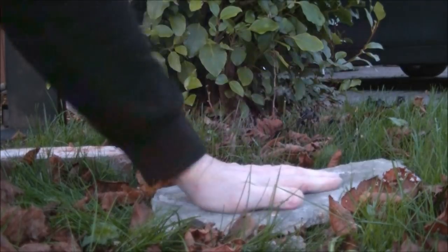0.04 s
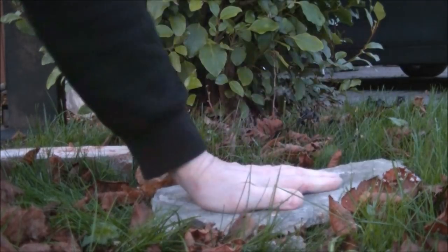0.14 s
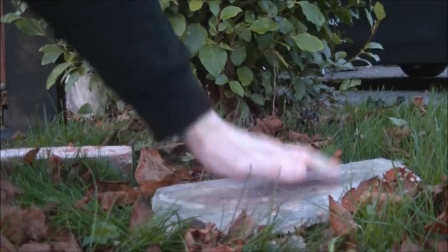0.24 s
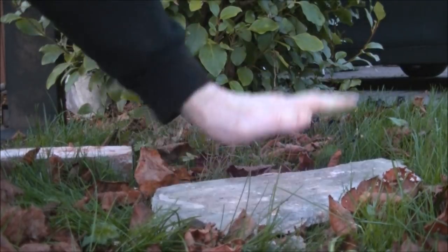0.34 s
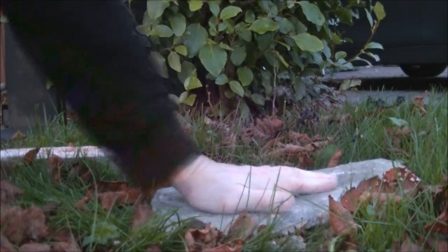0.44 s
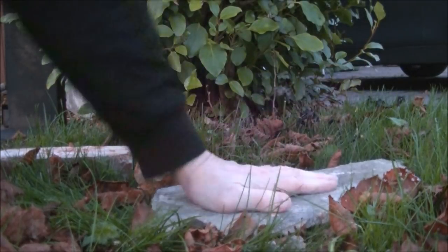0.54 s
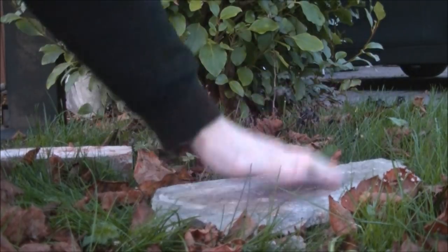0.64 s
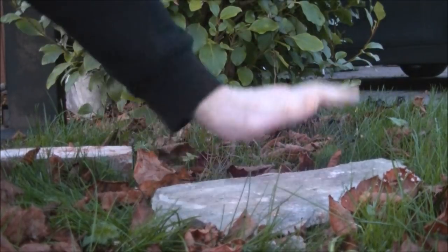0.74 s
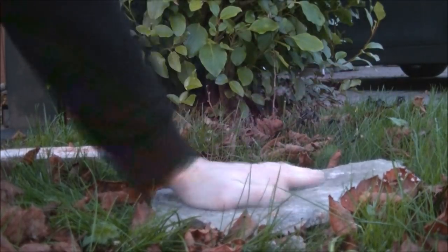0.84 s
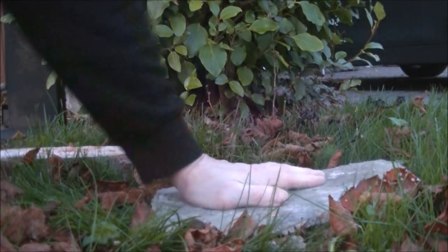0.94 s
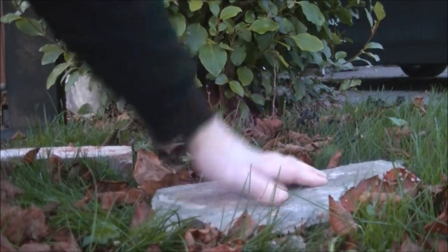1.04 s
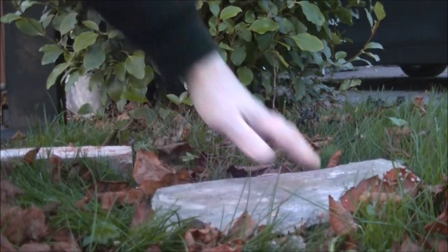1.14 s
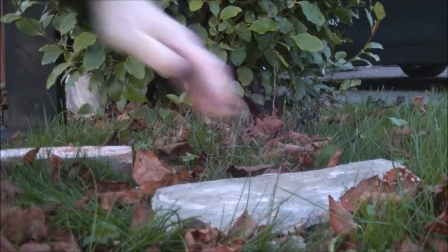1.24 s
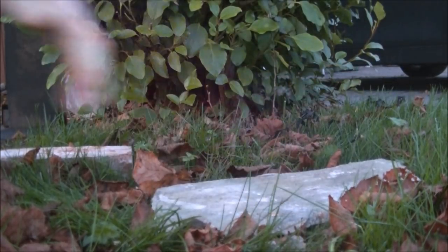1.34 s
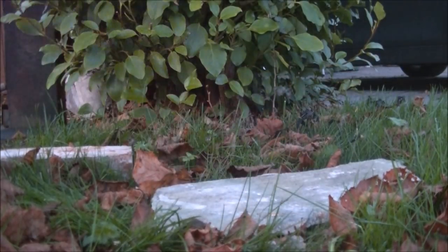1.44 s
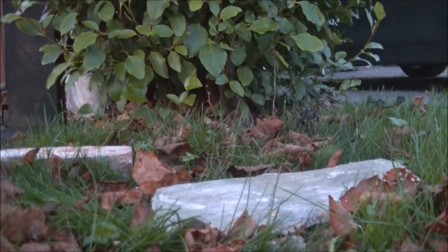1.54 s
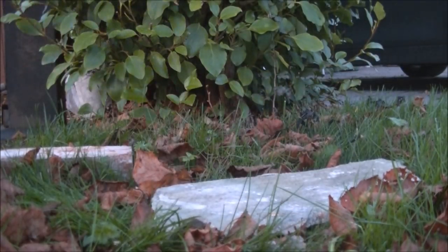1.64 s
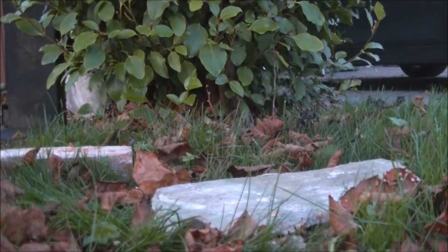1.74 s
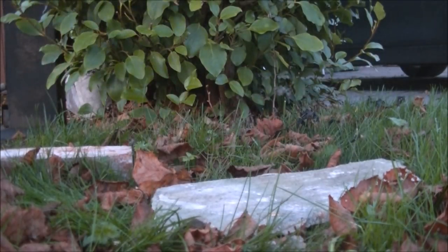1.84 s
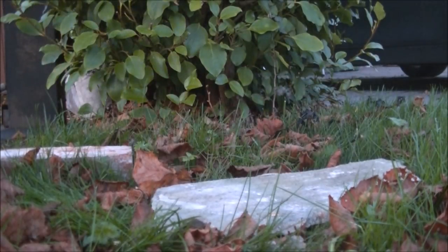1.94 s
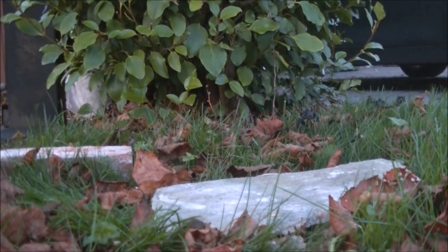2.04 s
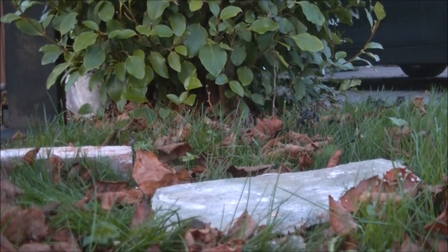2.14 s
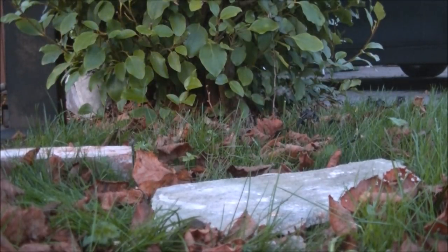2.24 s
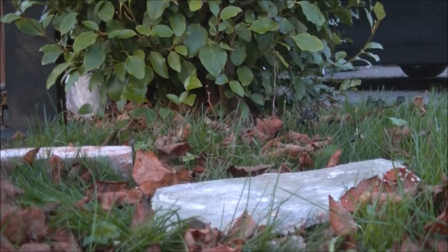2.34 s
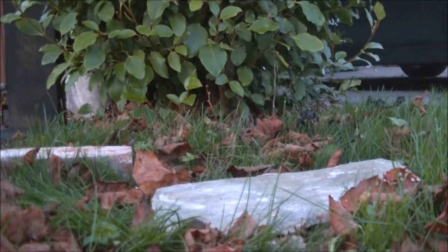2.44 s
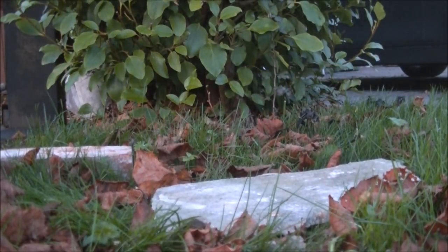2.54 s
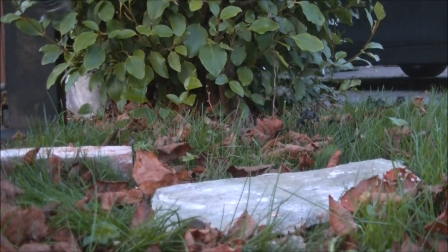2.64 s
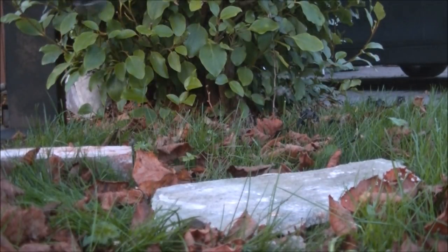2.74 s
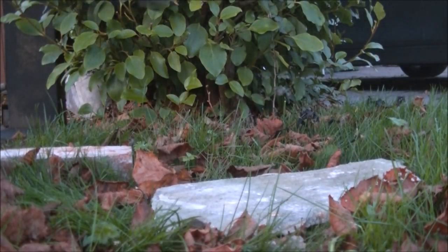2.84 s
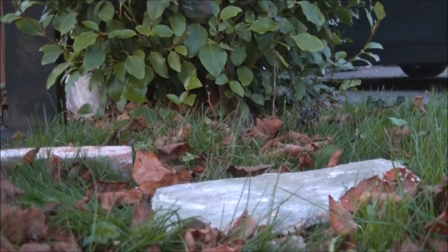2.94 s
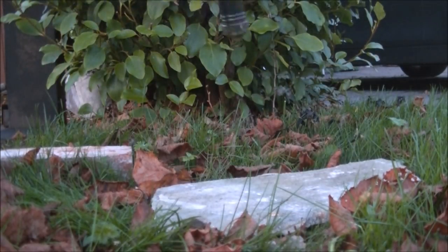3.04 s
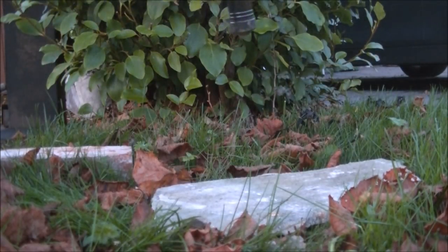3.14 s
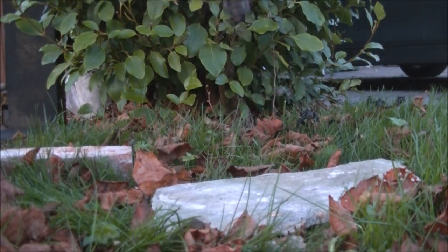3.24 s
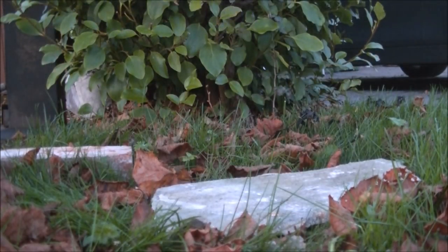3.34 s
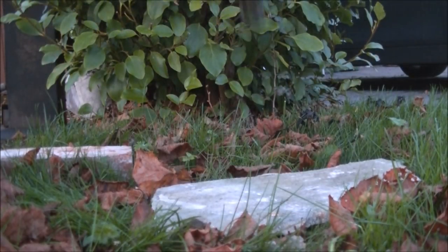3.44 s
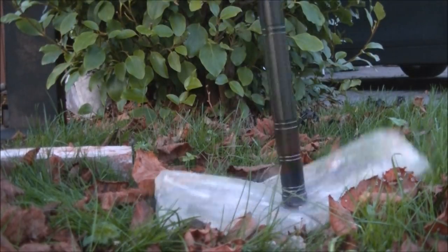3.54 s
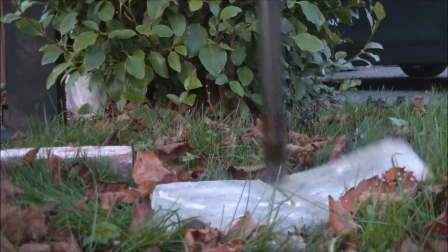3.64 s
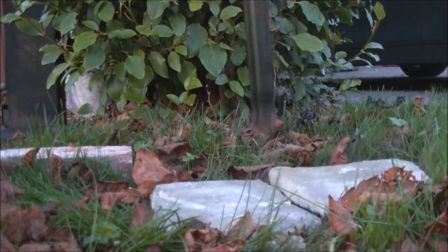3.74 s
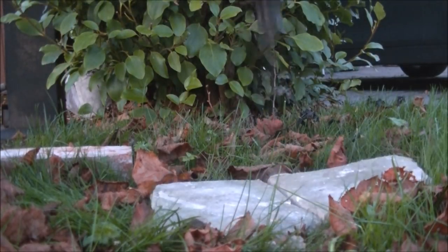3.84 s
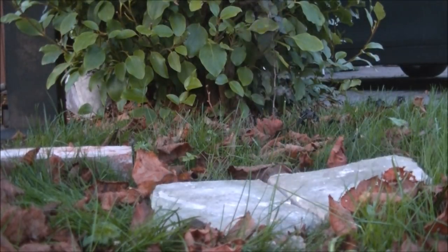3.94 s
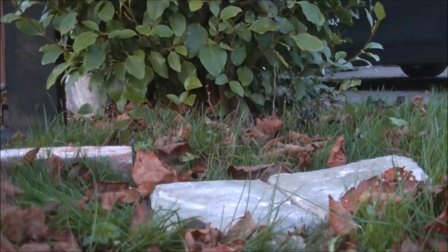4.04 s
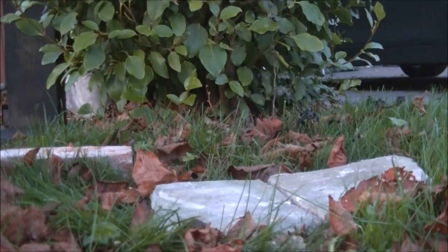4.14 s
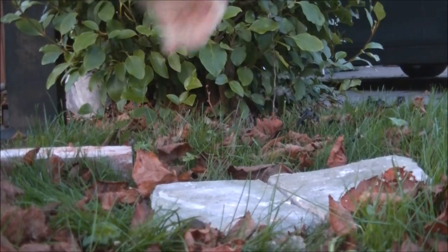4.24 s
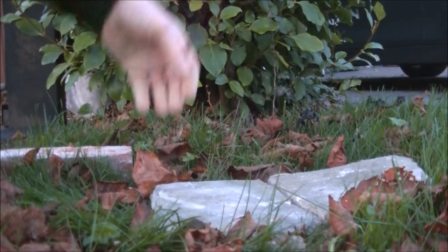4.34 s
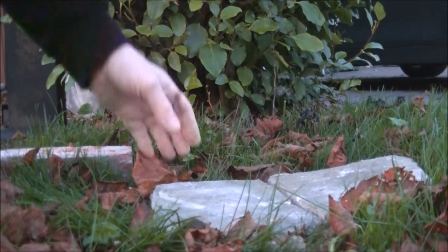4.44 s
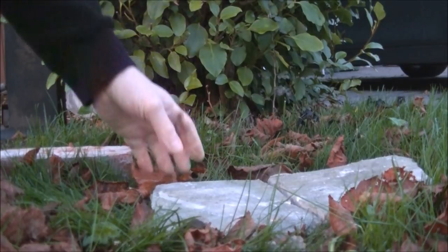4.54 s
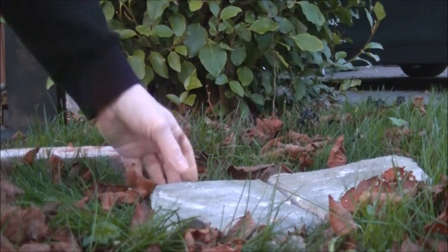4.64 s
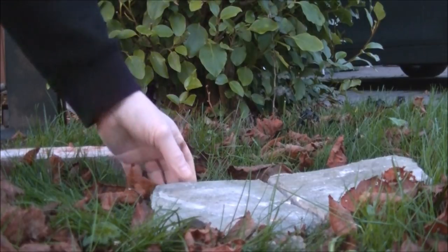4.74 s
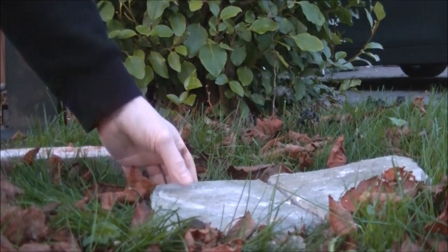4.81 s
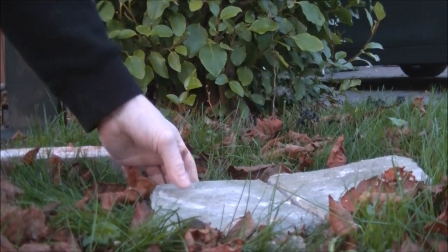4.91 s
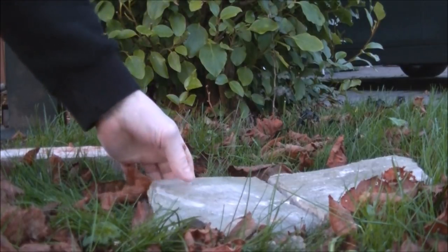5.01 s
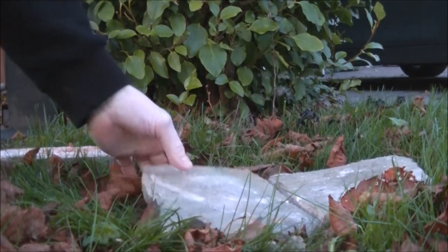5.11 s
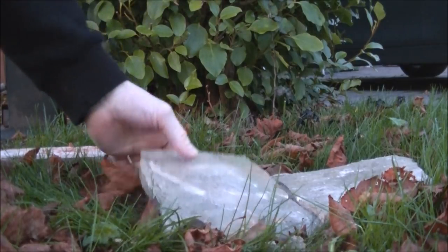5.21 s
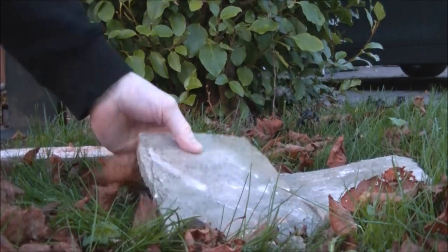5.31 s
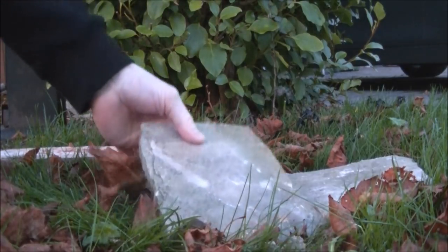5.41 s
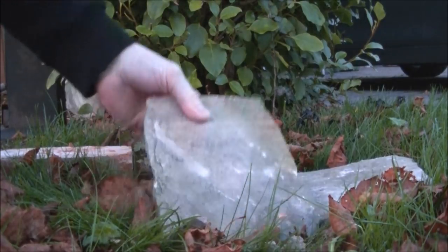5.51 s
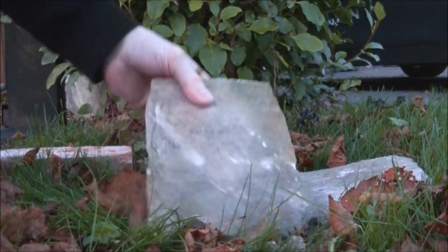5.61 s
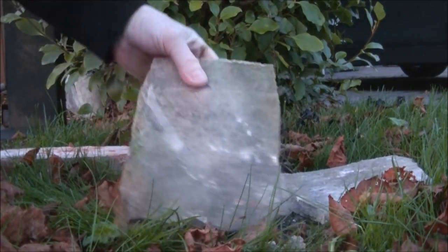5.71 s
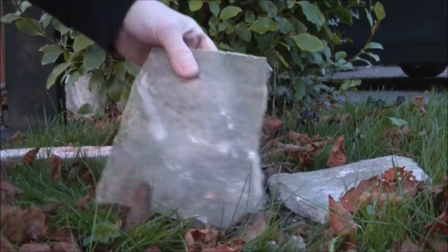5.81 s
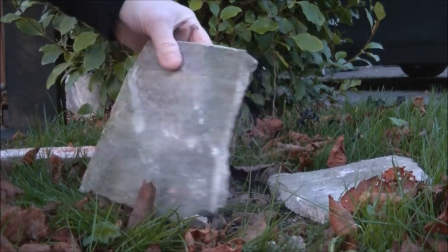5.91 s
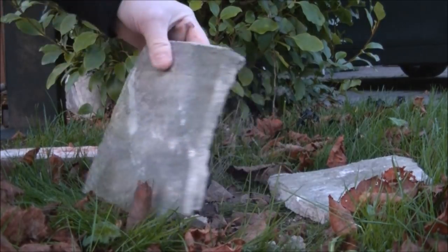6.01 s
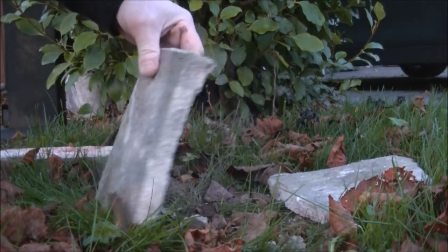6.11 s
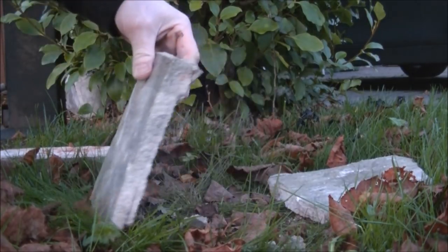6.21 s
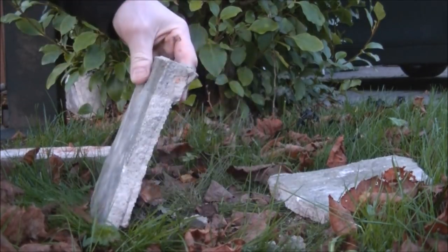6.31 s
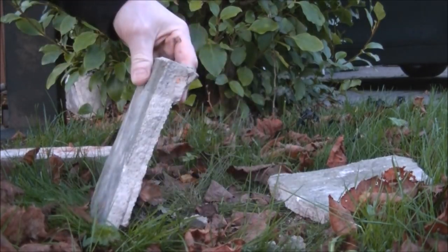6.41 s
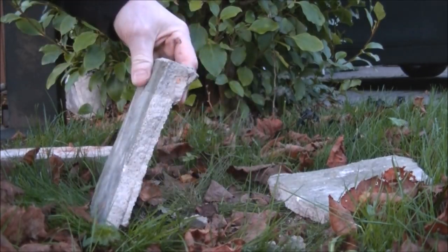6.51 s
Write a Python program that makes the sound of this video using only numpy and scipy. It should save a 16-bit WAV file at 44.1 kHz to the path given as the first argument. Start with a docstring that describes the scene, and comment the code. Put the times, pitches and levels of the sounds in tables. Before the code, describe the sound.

Three loud, short slaps of a flat hand on stone come in quick succession, followed by soft cloth rustling and leaf crackle. After a quiet gap with thin bird calls, a metal baton strikes with a sharp, slightly distorted crack and an outdoor echo. Pieces clatter briefly, then a broken half is lifted, scraping and clinking through grit and grass. Close stereo microphones, with faint far traffic behind.

```python
"""A flat hand slaps a stone slab three times in a front garden, then a metal baton cracks it in two.
The blows are shaped noise bursts over decaying stone modes; a house wall and the street return them.
The halves knock, land and lift with ticks and short rings; leaves snap in brief noise bursts.
A jacket sleeve and dragged stone rustle as showers of tiny slips; a small bird ticks in climbing whistles.
Far off, filtered noise murmurs as traffic; two close microphones hear it and the loudest peaks are rounded."""
import sys
import numpy as np
from scipy import signal
from scipy.fft import rfft, irfft, next_fast_len
from scipy.io import wavfile
from scipy.ndimage import uniform_filter1d

SR = 44100
rng = np.random.default_rng(int(sys.argv[2]) if len(sys.argv) > 2 else 0)


def digitize_waveform(pressure):
    """Quantize a signal to 16-bit integers and store it at the path in sys.argv[1].

    Rows of a 2-D input are taken as channels; values are limited to [-1, 1].
    """
    field = np.atleast_2d(pressure).T
    bounded = np.clip(field, -1, 1)
    quanta = np.round(bounded * 32767).astype(np.int16)
    wavfile.write(sys.argv[1], SR, quanta)


N = 289737

# palm on the slab: (time [s], level before force [dB], contact length [s], air rebound delay [s],
# thump [dB], smack [dB], sting [dB], slab ring [dB], echo send [dB])
PALM_SLAPS = [(.0056, -4.5, 0.0029, 0.00095, 7.5, 0.5, -2.5, 4, -4),
              (0.448, -4, 0.0036, 0.000913, 8, 3, 0.5, 0, 1),
              (0.8513, -1, .0024, 0.001, -3, 4.5, -1, -3.5, 2.5)]
# the pop of air under the palm: (frequency [Hz], level [dB])
PALM_POP = [(100, -33), (170, -9), (280, -3), (500, -3), (780, 2), (1100, 0.5), (1600, -1), (2200, -3.5),
            (3200, -7), (4300, -5.5), (5000, -12.5), (7000, -8), (10000, -13.5), (12000, -23), (16000, -38)]
# the whole slab, damped by soil and hand: (frequency [Hz], level [dB], t60 [s])
SLAB_MODES = [(385, -9.5, 0.056), (757, -2, 0.077), (2166, -5, 0.024), (2233, -5.5, 0.049),
              (3080, -6.5, 0.026)]


def slaps(force_db, ring_db):
    """The palm pops the air beneath it and rings the slab; gives the hits and the air's rebounds."""
    hits, rebounds = [], np.zeros(N)
    for s, db, length_s, rebound_s, thump_db, smack_db, sting_db, slab_db, echo_db in PALM_SLAPS:
        # the hand's shape colours each slap
        cupping = [(380, thump_db), (700, 0), (1100, 0), (1550, smack_db), (2200, 0), (3200, sting_db)]
        pop = colour(colour(contact(length_s), PALM_POP), cupping)
        pop = undb(db + force_db) * pop
        # trapped air springs back: hollow from close by
        add(rebounds, s + rebound_s, -0.65 * uniform_filter1d(pop, size=3))
        slab = undb(db + ring_db + slab_db) * ring(SLAB_MODES)
        hits.append((s, pop + slab, echo_db))
    return hits, rebounds


# baton tip, then the duller blow of the slab giving way: (time [s], level before force [dB],
# contact length [s], ring [dB], echo send [dB], top of the treble [Hz])
BATON_STRIKES = [(3.5162, 0, 0.0017, -3, 13.5, 14000), (3.521, -7, 0.00153, 4, 14.5, 2520)]
# the crack of metal on stone: (frequency [Hz], level [dB])
METAL_CRACK = [(90, -39), (230, -9.5), (430, 1), (750, 3.5), (1000, -3.5), (1600, 3.5), (2050, -1.5),
               (2600, -10.5), (3400, -8), (4800, -6.5), (6500, -11.5), (8500, -23), (16000, -41)]
# a broken half of the slab: (frequency [Hz], level [dB], t60 [s])
HALF_MODES = [(450, -5.5, 0.018), (620, -5.5, 0.057), (779, 2, 0.05), (1616, -6, 0.085),
              (2020, -4.5, 0.027), (3470, -12, 0.023), (4760, -10, 0.035)]


def strikes(force_db, ring_db):
    """Metal on stone: a band-limited crack over the ringing modes of a broken half."""
    hits = []
    for s, db, length_s, half_db, echo_db, top_hz in BATON_STRIKES:
        crack = undb(force_db) * band(colour(contact(length_s), METAL_CRACK), 97, top_hz)
        half = undb(ring_db + half_db) * ring(HALF_MODES)
        hits.append((s, undb(db) * (crack + half), echo_db))
    return hits


def blows(force_db, ring_db):
    """Slaps and strikes reach the microphones directly, then by way of the yard."""
    hits, rebounds = slaps(force_db, ring_db)
    hits += strikes(force_db, ring_db)
    close, sent = np.zeros((2, N))
    for s, hit, echo_db in hits:
        add(close, s, hit)
        add(sent, s, hit * undb(echo_db))
    direct = close + rebounds
    # a short noise burst smears the difference between the microphones
    slanted = signal.fftconvolve(direct, contact(0.00098))[:N]
    return spread(direct, slanted, width_db=-4.5) + yard(close, sent)


def contact(length_s):
    """A rough contact: a brief burst of force with nearly even energy at all frequencies."""
    t = np.arange(4096) / SR
    window = np.exp(-(t / length_s) ** 4)
    force = rng.standard_normal(len(t)) * window
    for _ in range(12):
        flat = irfft(np.exp(1j * np.angle(rfft(force))))  # keep the phases, level the spectrum
        force = flat * window
    return force


def ring(modes):
    """Decaying modes of struck stone, each slightly detuned on every blow."""
    t = np.arange(4096) / SR
    out = np.zeros(len(t))
    for hz, db, t60 in modes:
        detuned_hz = hz * (1 + 0.00098 * rng.standard_normal())
        out += undb(db) * fade(t, t60) * np.sin(2 * np.pi * detuned_hz * t)
    return out


def yard(close, sent):
    """What the surroundings give back of each blow: a near spray and the wall and street."""
    return scatter(close, db=-37.5, t60=0.083) + street(sent, wall_db=-17, wash_db=-58.0)


def scatter(x, db, t60):
    """Ground and hedge throw back a short, decaying spray of reflections."""
    t = np.arange(SR // 3) / SR
    noise = spread(*rng.standard_normal((2, len(t))), width_db=5.5)
    response = band(noise, 133, 14500, order=1) * fade(t, t60) * (t > 0.003)
    return undb(db) * signal.fftconvolve(x[None], response, axes=1)[:, :N]


# echo delay off the house wall [s]; decay of the street's lower and treble wash [s]
WALL_S, YARD_T60_S, TREBLE_T60_S = 0.041, 0.6, 0.66


def street(x, wall_db, wash_db):
    """A dull echo off the house wall, together with the dying wash of the street."""
    t = np.arange(SR * 3 // 4) / SR
    noise = spread(*rng.standard_normal((2, len(t))), width_db=4.5)
    wash = colour(noise, [(100, 0), (250, 7.0), (400, 4.5), (680, 3.0), (1100, -5.5),
                          (2800, 8.0), (4500, -3.5), (8000, -2.0), (14000, -1)])  # (Hz, dB)
    low = band(wash, 110, 5400) * fade(t, YARD_T60_S)
    treble = band(wash, 2920, 16400) * fade(t, TREBLE_T60_S)
    wall = band(1. * (t == 0), 230, 560)
    response = undb(wash_db) * (low + treble) + undb(wall_db) * wall
    out = np.zeros((2, N))
    add(out, WALL_S, signal.fftconvolve(x[None], response, axes=1))
    return out


# the broken halves knock together and land with low thuds; one thuds as it lifts from the soil:
# (time [s], peak level before gain [dB], ringing [Hz])
HALF_KNOCKS_AND_THUDS = [(3.585, -16, 620), (3.593, -15, 1590), (3.603, -23, 2140), (3.6256, -21, 1720),
                         (3.648, -23, 420), (3.7875, -26, 714), (5.0675, -31, 210), (5.094, -23.5, 2120),
                         (5.1323, -31, 2090), (5.1623, -20.5, 2020), (5.4656, -29, 3390),
                         (5.509, -24, 3350), (5.575, -16, 1686)]


def clinks(gain_db, t60, grit_db):
    """Halves knock, land or lift from the soil: a gritty tick and a short ring, low for a thud."""
    out = np.zeros(N)
    for s, db, hz in HALF_KNOCKS_AND_THUDS:
        tick = band(contact(0.0019), 500, 7000, order=1)
        stone = ring([(hz, 0, t60), (hz * 1.07, -6, t60), (hz * 1.8, -9, t60 / 2), (740, -11, t60)])
        x = stone + undb(grit_db) * tick
        add(out, s, undb(db + gain_db) * x / np.abs(x).max())
    return out


# something scrapes on stone and grit: the palm slides after a slap, the halves part and settle,
# one half is dragged free, swings upright through the grass and is turned on its edge:
# (fastest moment [s], rise [s], fall [s], level before layer gains [dB],
# body [dB relative], crispness [dB relative])
STONE_SCRAPES = [ (.52, 0.056, 0.09, -64, -3, -12), (.62, 0.031, 0.065, -66.5, -8, -3),
                 (.915, 0.15, 0.15, -58.5, -8, -20), (3.595, 0.068, 0.061, -49.5, 7, -15),
                 (3.672, 0.046, .07, -49.5, 2.5, -10), (3.78, 0.044, 0.14, -61, 11, -9),
                 (5.13, 0.27, 0.3, -52.5, 2, -8), (5.29, 0.06, 0.069, -56, 0, -11),
                 (5.372, 0.037, 0.048, -57, 0, -4.5), (5.53, 0.11, 0.18, -53, -2.5, -12.5),
                 (5.695, .16, .11, -50, 1, -6), (5.87, 0.083, 0.23, -75.5, -3, 3.5),
                 (6.165, 0.16, .14, -54, -1, -4), ]
# colour of stone on grit: (frequency [Hz], level [dB])
GRIT_COLOUR = [(120, -45), (200, -4), (258, -4.5), (540, -0.5), (1110, -3), (1570, 0), (1690, 0.5),
               (1850, -1.5), (2090, -4), (2330, -6), (5450, -13.5), (9550, -17), (15000, -36.5)]


def scrapes():
    """Stone and palm over grit: sparse slips of very uneven size, nearly alike at both microphones."""
    return rustle(STONE_SCRAPES, GRIT_COLOUR, grain_rate=900, grain_db=3.6, hiss=1.0,
                  flutter_db=1.2, shimmer_db=2.0, width_db=-12, body_db=-1.0, mid_db=2.0, crisp_db=5.5)


# the sleeve rubs as the arm moves: (fastest moment [s], rise [s], fall [s],
# level before layer gains [dB], body [dB relative], crispness [dB relative])
SLEEVE_STROKES = [ (1.105, 0.019, 0.018, -58.5, 1, 2), (1.33, 0.11, 0.075, -59, 0.5, -2.5),
                  (1.42, 0.086, 0.06, -48, -6, -7), (1.6, 0.083, 0.097, -47.5, 2, -5.5),
                  (1.745, 0.22, 0.25, -46.5, -1, -8.5), (1.97, 0.073, 0.079, -59.5, -5, -3),
                  (2.135, 0.089, 0.077, -43.5, -4, -3.5), (2.33, 0.11, 0.15, -56, -5, -2.5),
                  (2.95, 0.12, 0.16, -57.5, -23, -2.5), (3.035, 0.058, 0.053, -57.5, -17, -1.5),
                  (4.6, .09, 0.064, -58, -2.5, -2.5), (4.695, 0.079, 0.061, -50.5, -2.5, -1.5),
                  (4.785, 0.037, 0.051, -59, 0, -16), ]
# colour of the cloth: (frequency [Hz], level [dB])
CLOTH_COLOUR = [(88, -69), (150, -29), (216, -6), (294, -13.5), (687, -6), (866, -9.5), (1350, -7),
                (1510, -8.5), (2180, -3), (3820, 0.5), (6180, 1), (11000, -6), (15000, -21.5)]


def jacket():
    """Sleeve cloth: dense slips, wide across the microphones and a little to the left."""
    x = rustle(SLEEVE_STROKES, CLOTH_COLOUR, grain_rate=3000, grain_db=3.0, hiss=0.92,
               flutter_db=1.62, shimmer_db=2.5, width_db=4.5, body_db=1.5, mid_db=2.0, crisp_db=1.0)
    return x * undb(np.array([[1.2], [-1.2]]))  # the arm is on the left


def rustle(strokes, spectrum, grain_rate, grain_db, hiss, flutter_db, shimmer_db, width_db,
           body_db, mid_db, crisp_db):
    """Countless tiny slips of uneven size; each stroke sets its own body and crispness."""
    happens = rng.random(N) < grain_rate / SR  # grain_rate: slips per second
    sizes = undb(grain_db * np.minimum(rng.exponential(size=N), 5)) * happens
    slips = unit(sizes * rng.choice([-1, 1], (2, N))) + hiss * rng.standard_normal((2, N))
    fluttering = spread(*slips, width_db) * undb(flutter_db * walk(90))
    x = shimmer(colour(fluttering, spectrum), shimmer_db)
    # each layer is scaled by the level of a narrower band inside it
    mid = x.mean(0)
    body = band(x, 250, 2300, order=3) / np.std(band(mid, 600, 2200, order=4))
    middle = band(x, 2300, 8500, order=3) / np.std(band(mid, 2500, 4800, order=4))
    crisp = band(x, 8500, 18000, order=3) / np.std(band(mid, 9000, 13000, order=4))
    power = np.zeros((3, N))
    for s, rise_s, fall_s, db, body_rel, crisp_rel in strokes:
        gains = undb(db + np.array([body_rel + body_db, mid_db, crisp_rel + crisp_db]))
        power += np.outer(gains, swell(s, rise_s, fall_s)) ** 2
    return sum(np.sqrt(p) * layer for p, layer in zip(power, (body, middle, crisp)))


def shimmer(x, depth_db):
    """The colour keeps shifting as different patches of surface touch."""
    cells = signal.stft(x, nperseg=512)[2]
    patches = uniform_filter1d(rng.standard_normal(cells.shape[1:]), size=8, axis=0)  # over frequency
    patches = uniform_filter1d(patches, size=5, axis=1)  # over time
    return signal.istft(cells * undb(depth_db * unit(patches)))[1][:, :N]


# drop at the ends of a stroke's rise and fall [dB]; roundness of its top (1 pointed, 2 bell)
STROKE_DEPTH_DB, STROKE_ROUNDNESS = 18.5, 1.5


def swell(s, rise_s, fall_s):
    """Gain of one stroke: it swells to its fastest moment s, then dies away."""
    t = np.arange(N) / SR - s
    away = np.abs(t) / np.where(t < 0, rise_s, fall_s)
    return undb(-STROKE_DEPTH_DB * np.minimum(away, 10) ** STROKE_ROUNDNESS)


# dry leaves and twigs snap: (time [s], peak level before gain [dB], centre [Hz])
LEAF_SNAPS = [(0.7903, -41, 3800), (1.383, -33, 6000), (1.5306, -32.5, 4600), (1.6169, -22, 2640),
              (1.7551, -23.5, 2860), (1.8537, -29, 5000), (2.2959, -30.5, 5400), (3.6276, -30, 7960),
              (3.662, -29, 6600), (3.676, -29, 7000), (3.876, -35.5, 4970), (4.816, -37, 8950),
              (5.070, -28, 9400), (5.681, -28.5, 4400), (5.934, -40.5, 4500), (6.03, -40, 3650),
              (6.205, -34, 5800)]


def snaps(gain_db, t60, tail_db, tail_t60):
    """Each dry leaf or twig breaks with a sharp tick and a little crackle."""
    out, t = np.zeros((2, N)), np.arange(2048) / SR
    decay = fade(t, t60) + undb(tail_db) * fade(t, tail_t60)
    for s, db, hz in LEAF_SNAPS:
        burst = spread(*rng.standard_normal((2, len(t))), width_db=-4.5) * decay
        x = band(burst, hz / 2, hz * 1.17, order=1)
        add(out, s, undb(db + gain_db) * x / np.abs(x).max())
    return out


# bird calls nearby: (time [s], level [dB], pitch ratio)
BIRD_CALLS = [(0.085, -41.5, 1.03), (0.188, -40.5, 1.07), (.349, -41, 1.05), (2.185, -40, 1.03),
              (2.368, -40.5, 1.02), (2.508, -41, 1.07), (2.603, -39.5, 1.02), (2.759, -40, 1.04),
              (4.524, -41, 1.04), (4.609, -41.5, .99), (4.738, -40, 1.04), (4.791, -40.5, 1.05),
              (4.934, -39, 1.04), (6.465, -40, 1.024)]
# a call is three upward flicks, two raspy and one cleaner:
# (time from call start [s], starting pitch before ratio [Hz], level [dB], t60 [s], rasp [0-1])
CALL_FLICKS = [(0, 4660, 1, 0.1, 0.96), (.011, 5440, -1.5, 0.059, 1), (.04, 4900, 6.5, 0.038, .3)]


def bird(rasp_hz, direct_db, hedge_db, hedge_t60):
    """Upward whistled flicks, raspy then cleaner, blurred by the leaves around the bird."""
    out = np.zeros(N)
    for start, call_db, pitch in BIRD_CALLS:
        for s, start_hz, db, t60, rasp in CALL_FLICKS:
            add(out, start + s, undb(call_db + db) * flick(start_hz, pitch, t60, rasp_hz * rasp))
    out = band(out, 4550, 8470, order=6)
    return undb(direct_db) * out + scatter(out, db=hedge_db, t60=hedge_t60)


# every flick climbs toward this pitch, times the call's pitch ratio; climb and attack time constants
FLICK_TOP_HZ, FLICK_CLIMB_S, FLICK_ATTACK_S = 7790, 0.00405, 0.0021


def flick(start_hz, pitch, t60, waver_hz):
    """One short whistle that climbs and fades; a fast waver makes it rasp."""
    t = np.arange(2048) / SR
    hz = pitch * (FLICK_TOP_HZ + (start_hz - FLICK_TOP_HZ) * np.exp(-t / FLICK_CLIMB_S))
    wobble = unit(band(rng.standard_normal(len(t)), 140, 1230))
    phase = 2 * np.pi * np.cumsum(hz + waver_hz * wobble) / SR
    return (1 - np.exp(-t / FLICK_ATTACK_S)) * fade(t, t60) * np.sin(phase)


# colour of the distant traffic: (frequency [Hz], level [dB])
TRAFFIC_COLOUR = [(25, -37), (60, -9.5), (108, -15.5), (141, -13), (175, -2), (236, -2.5), (270, -4),
                  (363, -3.5), (1040, -2), (1560, -5), (2990, -16.5), (4490, -19.5), (8360, -24.5),
                  (14800, -31), (16000, -50)]
# a far engine's drone: (time [s], level [dB])
ENGINE_DRONE = [(0, -69), (2.3, -71), (2.7, -62), (3.2, -68.5), (3.9, -80.5), (6.0, -85), (6.35, -66)]


def town(traffic_db, hum_hz):
    """Far traffic: coloured noise over a low rumble, wandering slightly, and a narrow-band drone."""
    wash = colour(spread(*rng.standard_normal((2, N)), width_db=11), TRAFFIC_COLOUR)
    wash = wash / np.std(band(wash[0], 300, 1500, order=4))
    rumble = undb(-12) * unit(band(rng.standard_normal((2, N)), 70.7, 143, order=3))
    traffic = (wash + rumble) * undb(traffic_db + 0.99 * walk(7.7))
    drone = unit(band(rng.standard_normal(N), hum_hz - 4, hum_hz + 4))
    drone_s, drone_db = np.transpose(ENGINE_DRONE)
    return traffic + drone * undb(np.interp(np.arange(N) / SR, drone_s, drone_db))


# how much the two microphones differ: (frequency [Hz], side minus mid [dB])
MIC_DIFFERENCE = [(60, -10), (130, 6), (260, -3), (500, -15.5), (1000, -17.5), (2000, -18.5), (4000, -13),
                  (8000, -6), (12000, -0.5)]


def spread(mid, side, width_db):
    """Two close microphones: most alike in the middle range, less so for diffuse sound."""
    points = [(hz, min(db + width_db, 0)) for hz, db in MIC_DIFFERENCE]
    return mid + colour(side, points) * np.array([[1], [-1]])


def undb(db):
    """Decibels to gain."""
    return 10 ** (np.asarray(db) / 20)


def add(out, s, x):
    """Mix x into out from time s on."""
    i = max(int(s * SR), 0)
    out[..., i:i + x.shape[-1]] += x[..., :max(N - i, 0)]


def band(x, lo_hz, hi_hz, order=2):
    """Causal band-pass."""
    edges = [lo_hz, min(hi_hz, SR / 2 - 1000)]
    return signal.sosfilt(signal.butter(order, edges, "band", fs=SR, output="sos"), x)


def unit(x):
    """Scale to rms 1."""
    return x / np.sqrt(np.mean(x ** 2))


def colour(x, points):
    """Causal minimum-phase filter whose gain follows (Hz, dB) points."""
    size = next_fast_len(x.shape[-1] // 2 + 1024) * 2
    hz, db = np.transpose(points)
    log_hz = np.log(np.fft.rfftfreq(size, 1 / SR) + 1)
    cepstrum = irfft(np.log(undb(np.interp(log_hz, np.log(hz), db))))
    # folding the cepstrum forward in time makes the filter causal
    cepstrum[1:size // 2] *= 2
    cepstrum[size // 2 + 1:] = 0
    return irfft(rfft(x, size) * np.exp(rfft(cepstrum)))[..., :x.shape[-1]]


def walk(rate):
    """Random wandering about zero with rms 1, through rate new points per second."""
    steps = rng.standard_normal(int(N / SR * rate) + 2)
    return unit(np.interp(np.arange(N) / SR * rate, np.arange(len(steps)), steps))


def fade(t, t60):
    """Exponential decay, 60 dB down after t60."""
    return np.exp(-np.log(1000) * t / t60)


def scene():
    """Blows, handling, bird and town together."""
    small = clinks(gain_db=-12, t60=0.06, grit_db=10)
    small = small + snaps(gain_db=-1.0, t60=0.017, tail_db=0, tail_t60=0.042)
    calls = bird(rasp_hz=940, direct_db=0.0, hedge_db=-32, hedge_t60=0.32)
    background = town(traffic_db=-57, hum_hz=170.6)
    return blows(force_db=20.5, ring_db=-20.0) + small + scrapes() + jacket() + calls + background


def record(dry):
    """The recorder flattens the tops of the blows, thins the deep bass and cuts the highest treble."""
    ceiling = 0.49  # full scale is 1
    clipped = dry / (1 + (dry / ceiling) ** 4) ** (1 / 4)
    thinned = signal.sosfilt(signal.butter(2, 65, "high", fs=SR, output="sos"), clipped)
    return signal.sosfilt(signal.ellip(8, 0.2, 70, 15800, fs=SR, output="sos"), thinned)


dry = scene()
out = record(dry)
digitize_waveform(out)
```